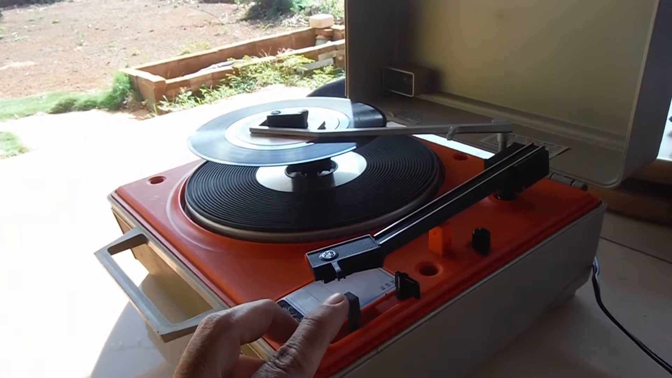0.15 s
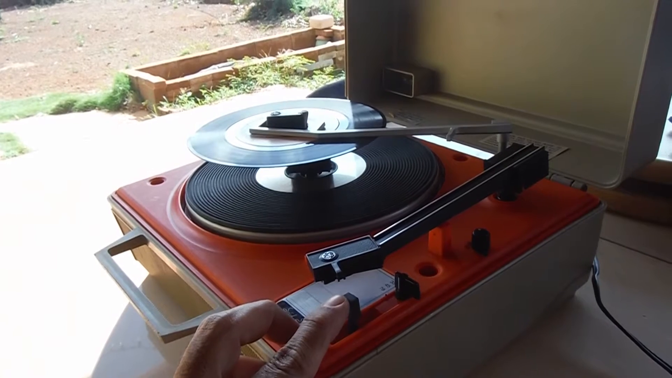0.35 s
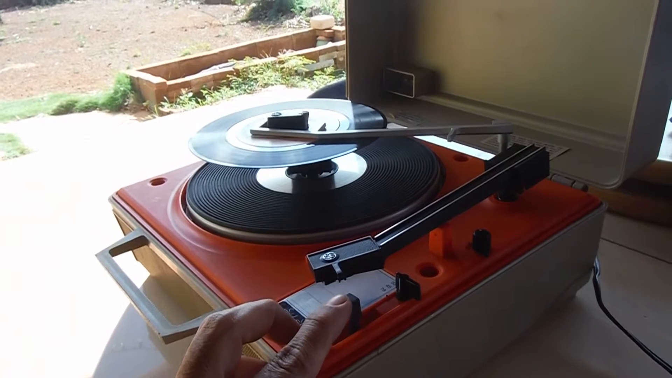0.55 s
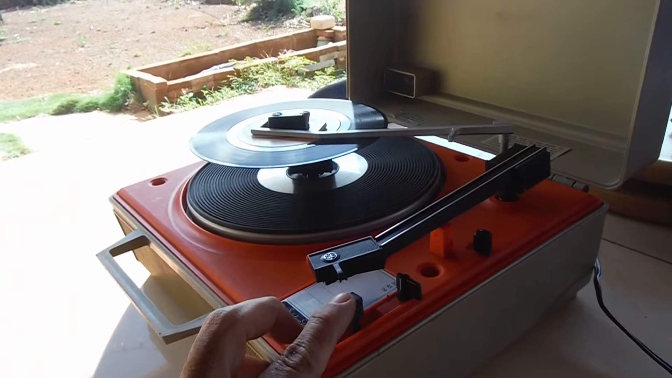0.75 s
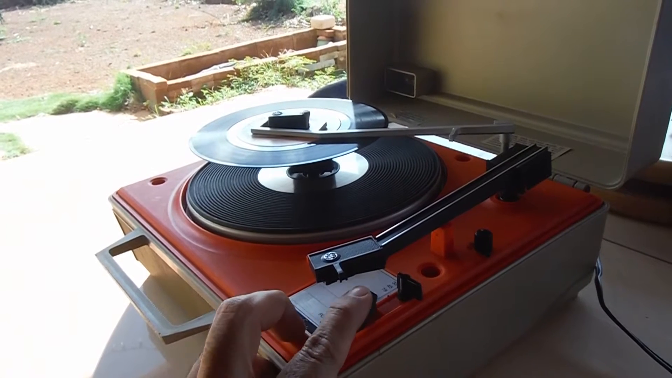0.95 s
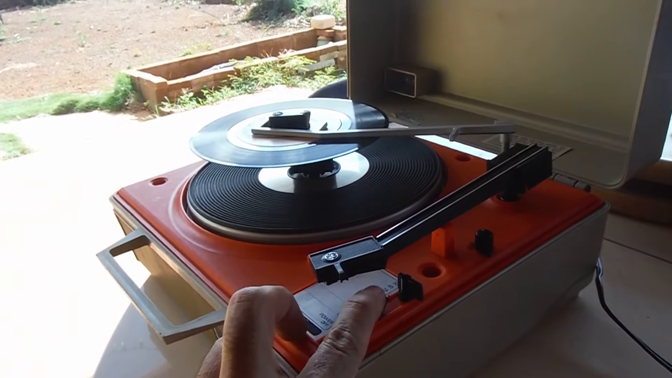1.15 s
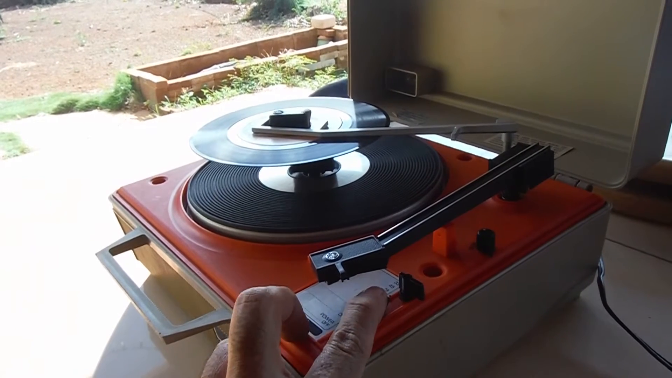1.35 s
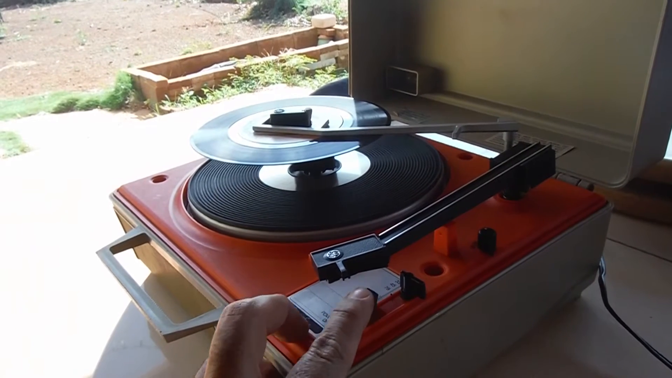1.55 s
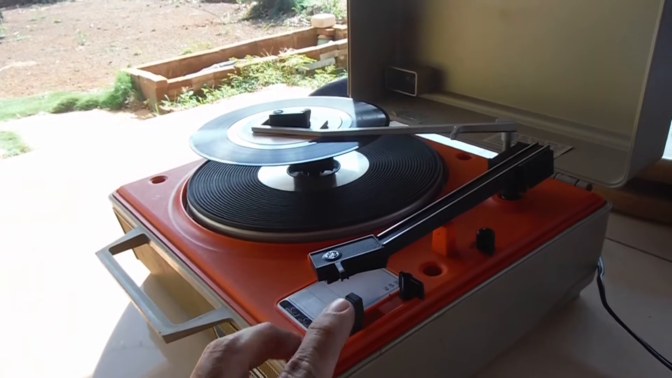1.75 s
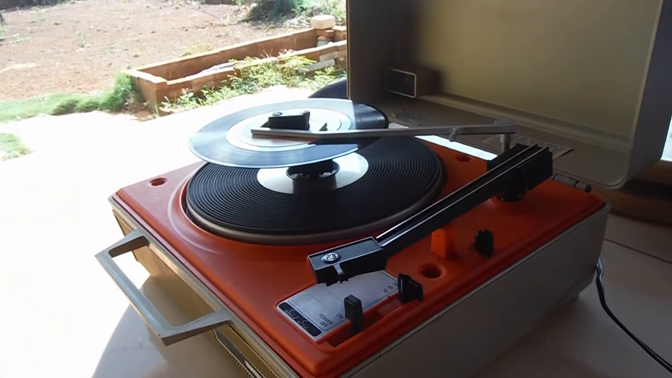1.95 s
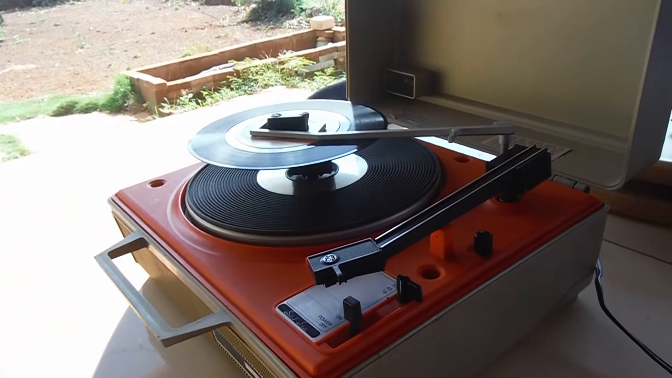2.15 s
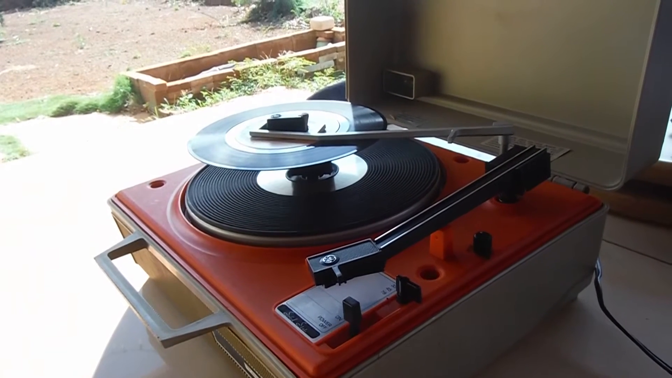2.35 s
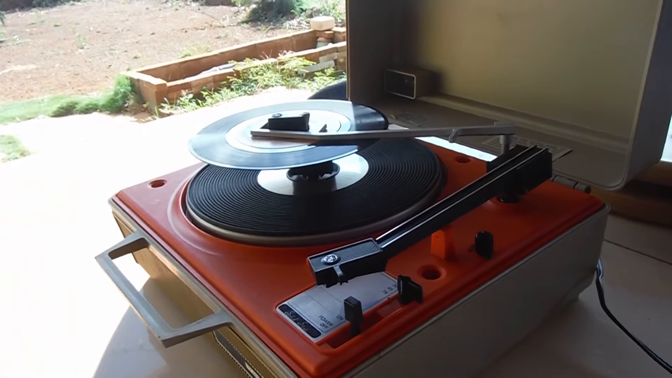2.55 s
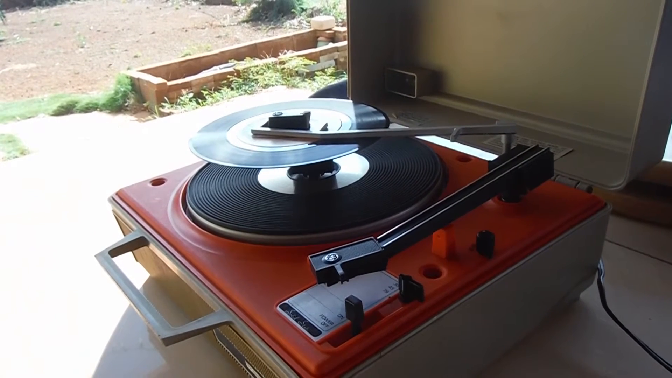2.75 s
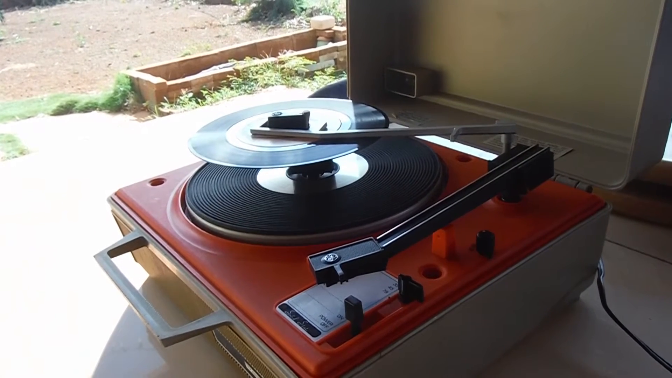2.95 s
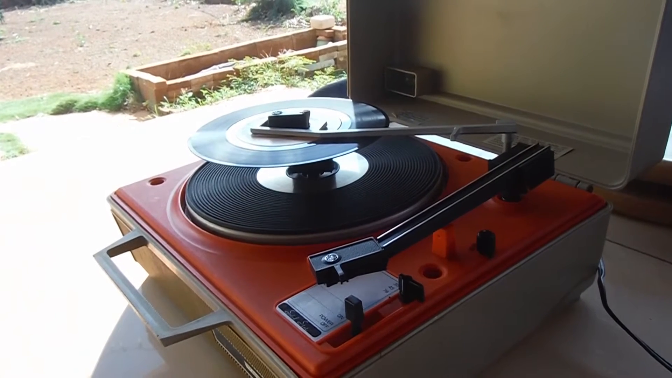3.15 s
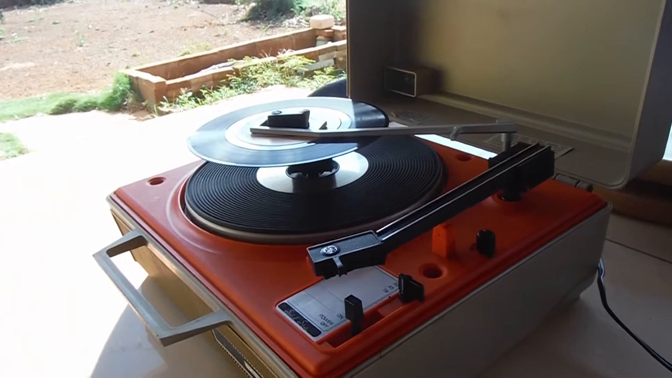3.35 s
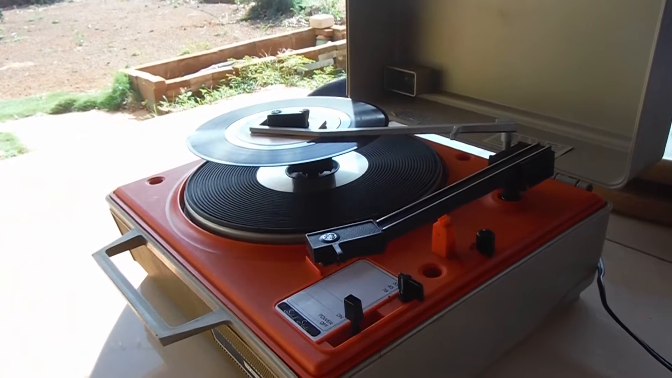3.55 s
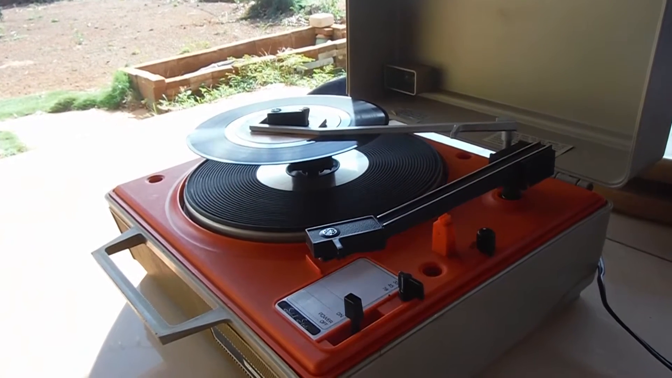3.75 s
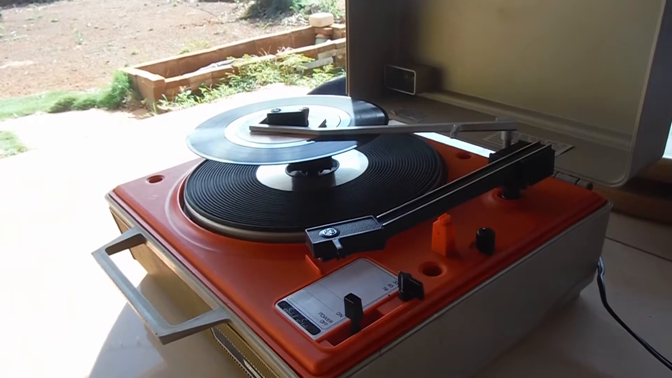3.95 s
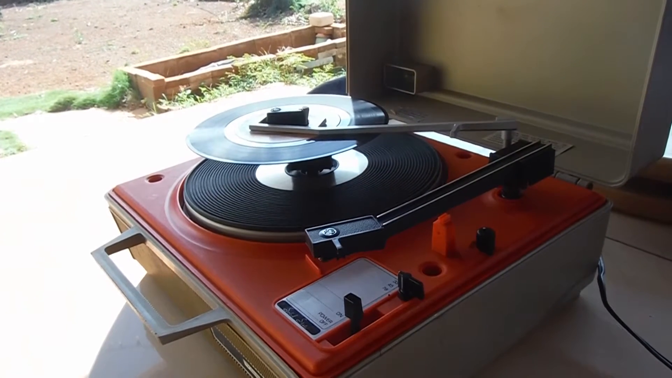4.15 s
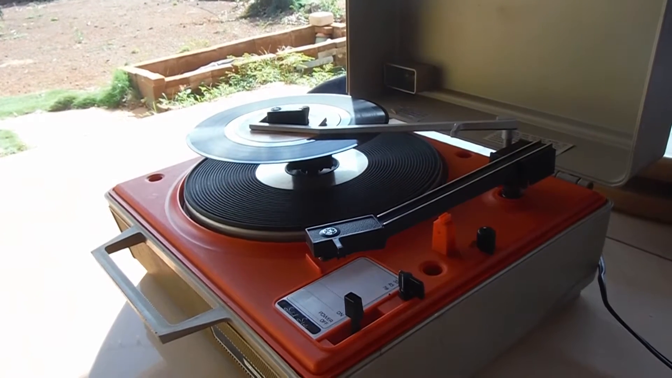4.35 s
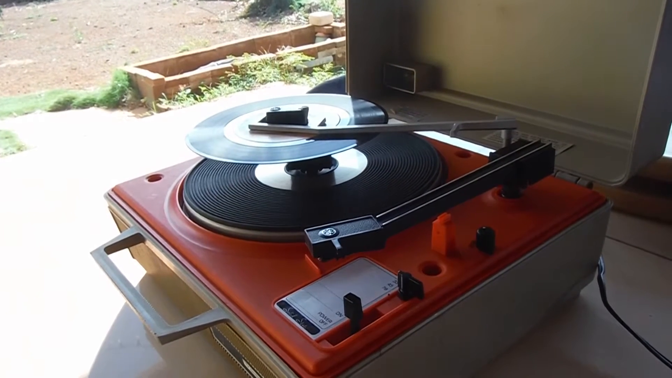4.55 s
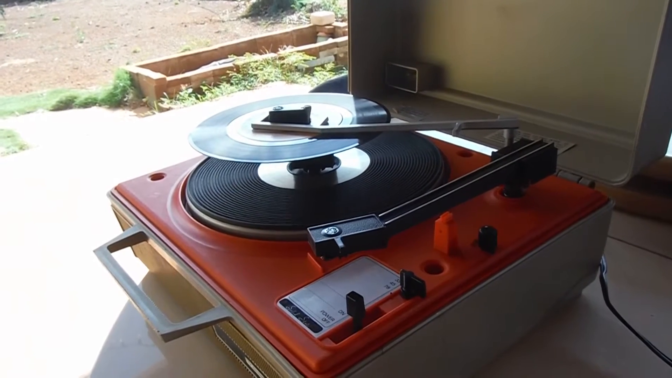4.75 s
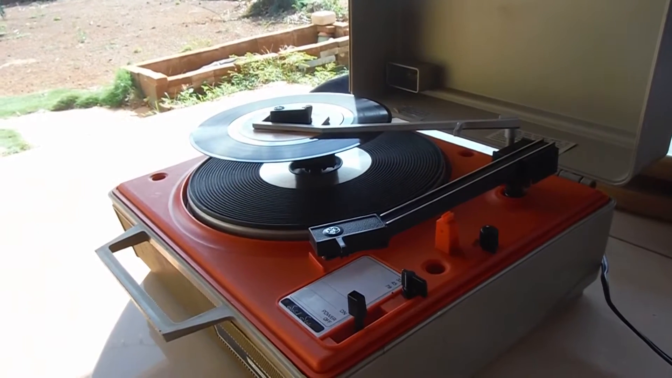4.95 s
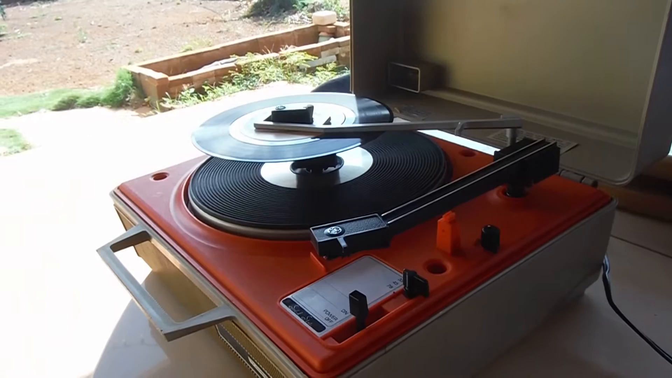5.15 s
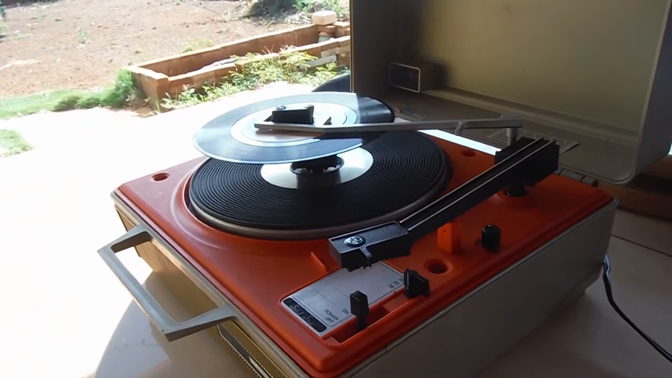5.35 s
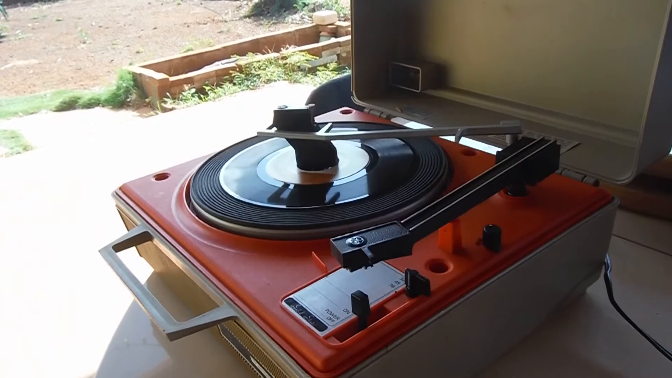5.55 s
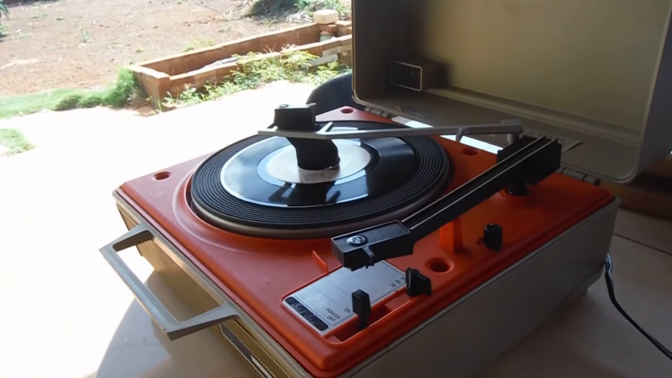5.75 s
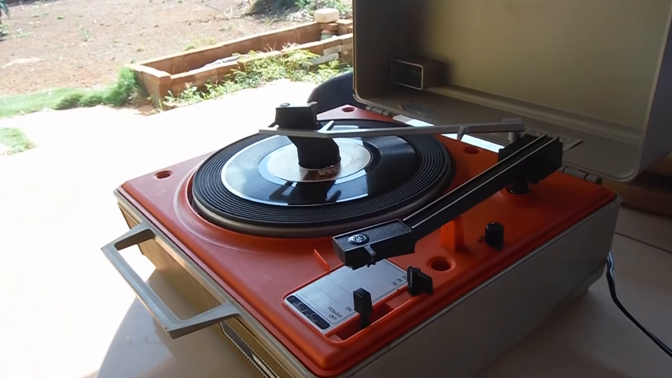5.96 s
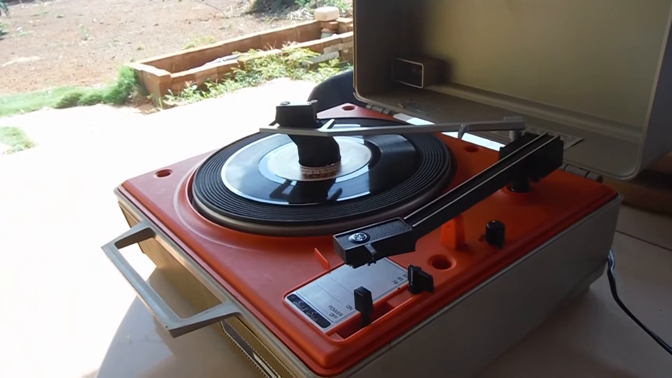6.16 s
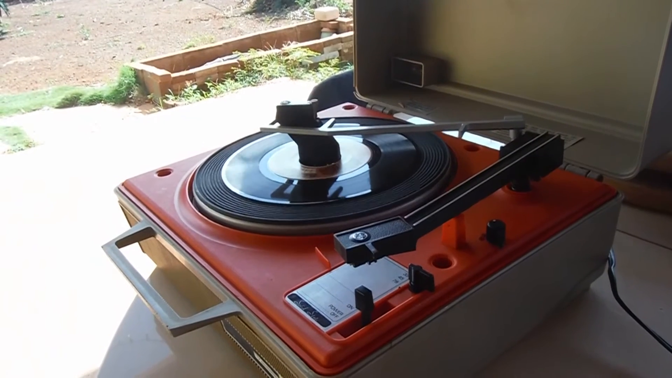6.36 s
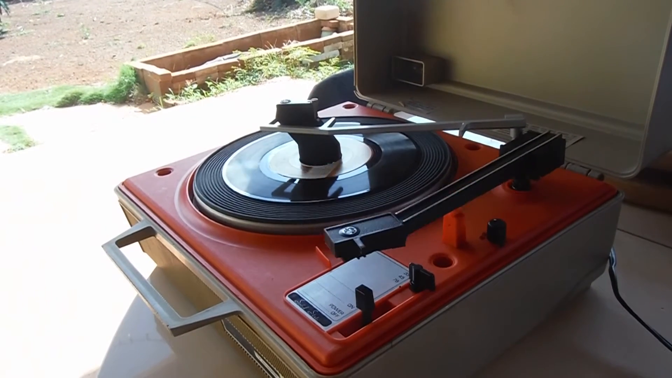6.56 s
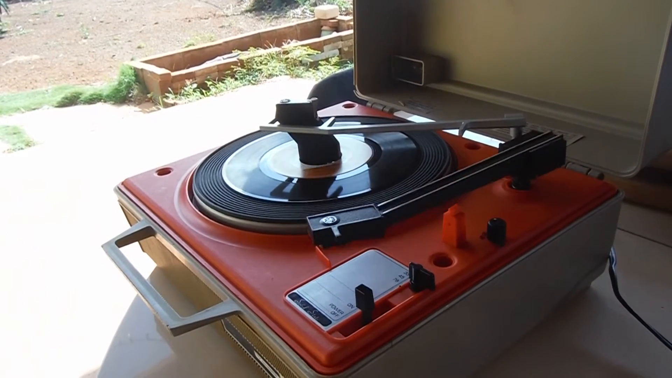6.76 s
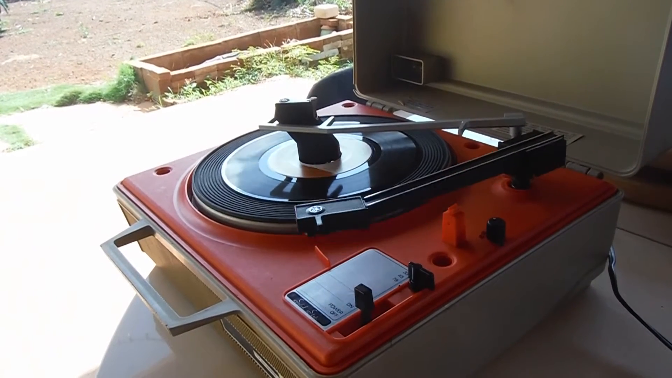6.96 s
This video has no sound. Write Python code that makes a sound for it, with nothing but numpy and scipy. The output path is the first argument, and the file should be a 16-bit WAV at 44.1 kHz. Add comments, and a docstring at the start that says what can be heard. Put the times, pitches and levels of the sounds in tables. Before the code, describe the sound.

Clicks and clacks of an automatic record player dropping a disc onto its platter, over a faint motor hum and low wind rumble.

```python
"""A porch, the microphone close to a portable record changer. Its drive hums and whirrs from the start,
while an insect's thin buzz fades out against a far chorus in the garden. Just after 1 s a finger slides
the lever through its detents, and puffs of air begin to thud on the microphone. From 2.2 s cam and tone
arm knock under the deck; near 4 s the steel linkage snaps over. At 5.5 s the spindle lets go and a
single slaps onto the platter, the loudest sound; two light knocks follow as the drive runs on."""
import sys
import numpy as np
from scipy import signal
from scipy.fft import rfft, irfft, next_fast_len
from scipy.io import wavfile
from scipy.ndimage import map_coordinates

SR = 44100
rng = np.random.default_rng(int(sys.argv[2]) if len(sys.argv) > 2 else 0)


def file_out(sig):
    """Save sig as 16-bit WAV at sys.argv[1]."""
    # one column per channel
    cols = np.atleast_2d(sig).T
    # limit, then scale
    lim = np.clip(cols, -1, 1)
    pcm = np.round(lim * 32767).astype(np.int16)
    wavfile.write(sys.argv[1], SR, pcm)


N = 308876


def amp(db):
    """Decibels to gain."""
    return 10 ** (np.asarray(db) / 20)


def unit(x):
    """x at rms 1."""
    return x / np.sqrt(np.mean(x ** 2) + 1e-20)


def along(points, hz):
    """Interpolate (f/Hz, value) points on a log frequency axis."""
    f, v = np.transpose(points)
    return np.interp(np.log(hz + 1), np.log(f + 1), v)


def wobble(rate):
    """A smooth random curve, rate knots a second."""
    coarse = np.linspace(0, N, 3000)
    knots = map_coordinates(rng.standard_normal(1024), [coarse * rate / SR], mode="wrap")
    return np.interp(np.arange(N), coarse, knots)


def noise(spectrum):
    """Noise of rms 1, shaped by (f/Hz, level/dB) points."""
    m = next_fast_len(N + 8192)
    gain = amp(along(spectrum, np.fft.rfftfreq(m, 1 / SR)))
    return unit(irfft(rfft(rng.standard_normal(m)) * gain, m)[:N])


def add(track, s, sound):
    """Mix a sound into the track at s seconds."""
    start = round(s * SR)
    track[start:start + len(sound)] += sound[:N - start]


def gate(start, end, rise_s, fall_s):
    """An envelope from 0 to 1: attack at the start, hold, and release from the end."""
    t = np.arange(N) / SR
    return np.clip((t - start) / rise_s, 0, 1) * np.exp(-np.maximum(t - end, 0) / fall_s)


def swells(rows, rise_s, fall_s):
    """The gain of (start/s, end/s, level/dB) swells, their powers added."""
    return np.sqrt(sum((amp(db) * gate(start, end, rise_s, fall_s)) ** 2 for start, end, db in rows))


def shifts_db(rows, rise_s, fall_s):
    """A level that rests at 0 dB and shifts for each (start/s, end/s, shift/dB)."""
    return sum(db * gate(start, end, rise_s, fall_s) for start, end, db in rows)


def drive(lull_db):
    """The motor drones, hums and whirrs; a low, unsteady tone swells as the cam loads it."""
    hum_partials = [(289, -68.5), (720, -76.5), (1095, -68.5), (1216, -75.5)]  # motor hum: f/Hz, level/dB
    whirr_spectrum = [(130, -24), (220, -2), (336, -5.5), (404, -9.5), (610, -11), (714, -9.5), (787, -12),
                      (1020, -11.5), (1090, -12), (1410, -16.5), (4000, -30.5), (5200, -48.5), (8800, -120)]  # running drive: f/Hz, level/dB
    arm_swing = [(3.53, 3.92, 2)]  # more whirr while the tone arm moves: start/s, end/s, lift/dB
    drone_swells = [(1.95, 3.05, -57.5), (5.7, 6.6, -52.5)]  # the low drone grows: start/s, end/s, level/dB
    cam_strokes = [(2.3, 2.68, -62), (2.85, 3.3, -58.5), (3.5, 3.93, -57), (4.18, 4.65, -60),
                   (5.0, 5.9, -63.5), (6.3, 6.95, -65)]  # the cam takes up the load: start/s, end/s, level/dB
    load_rise_s, load_fall_s = 0.07, 0.09

    def tone(hz, drift):
        """A sine of rms 1 with wandering pitch."""
        pitch_hz = hz * (1 + drift * wobble(21))
        return np.sqrt(2) * np.sin(2 * np.pi * np.cumsum(pitch_hz) / SR)

    effort_db = lull_db + shifts_db(arm_swing, load_rise_s, load_fall_s)
    hum = sum(amp(db + effort_db / 2 + 1.3 * wobble(3.1)) * tone(hz, drift=0.002)
              for hz, db in hum_partials)
    drone_gain = np.hypot(amp(-61.5 + 2.8 * lull_db), swells(drone_swells, load_rise_s, load_fall_s))
    drone = drone_gain * amp(2.5 * wobble(16)) * tone(hz=104, drift=0.13)
    cam_gain = swells(cam_strokes, rise_s=0.12, fall_s=0.196)
    cam = cam_gain * amp(-1 + 3.6 * wobble(45)) * tone(hz=335, drift=0.01193)
    whirr = amp(-59 + effort_db) * noise(whirr_spectrum)
    return hum + drone + cam + whirr


def garden(lull_db):
    """Beyond the porch: hiss, far insects, a nearer one's brief buzz, and a faint rustle each second."""
    chorus_spectrum = [(9300, -41), (10000, -5.5), (10500, -4), (11000, -10), (11550, -2), (12200, -7),
                       (13200, -43)]  # far insects: f/Hz, level/dB
    buzz_spectrum = [(9400, -25), (10100, -11), (10900, -24.5), (11300, -15.5), (11530, -2), (11800, -18),
                     (12250, -7), (12900, -26), (14500, -24)]  # the nearer insect: f/Hz, level/dB
    buzz_fade = [(0, -75), (.15, -71.5), (.45, -67), (.72, -70.5), (.85, -85), (1.1, -120)]  # its buzz swells and fades: t/s, level/dB
    rustle_spectrum = [(3000, -20), (6500, 1), (8500, -1), (11000, -21), (15000, -40)]  # high rustle: f/Hz, level/dB
    hiss_spectrum = [(1000, -3.5), (3000, -2), (9500, -2), (12500, -4), (15800, -5)]  # background hiss: f/Hz, level/dB
    t = np.arange(N) / SR
    hiss_db = -63.5 + lull_db
    chorus = amp(hiss_db - 12 + 4.5 * wobble(110)) * noise(chorus_spectrum)
    insect_db = np.interp(t, *np.transpose(buzz_fade))
    insect = amp(insect_db + 2.5 * wobble(28)) * noise(buzz_spectrum)
    from_rustle_s = (t - 0.38) % 1 - 0.5
    rustle = amp(-65.5) * np.exp(-(from_rustle_s / 0.018) ** 2) * noise(rustle_spectrum)
    return amp(hiss_db) * noise(hiss_spectrum) + chorus + insect + rustle


def draught(lull_db):
    """Gusts bring a lumpy rumble and shed eddies: each is one push and pull on the microphone."""
    gusts = [(1.24, 1.37, -49), (1.91, 1.96, -51), (2.36, 2.78, -50), (3.0, 3.09, -48.5),
             (3.9, 4.28, -56.5), (5.24, 5.45, -50), (5.65, 6.96, -51), (6.41, 6.53, -43.5)]  # air reaching the microphone: start/s, end/s, level/dB
    rumble_spectrum = [(10, -24.5), (20, 0), (45, 1), (100, -5), (150, -4.5), (220, -12.5), (320, -16.5),
                       (450, -27.5), (900, -71)]  # wind rumble: f/Hz, level/dB
    puffs = [(1.256, -30.5, 121), (2.132, -33, 117), (2.388, -32, 143), (2.474, -31.5, 49.7),
             (2.557, -31, 94), (2.801, -34, 57.6), (2.844, -32, 148), (5.26, -28.5, 124),
             (5.784, -26.5, 100), (5.908, -28.5, 136), (6.171, -36.5, 170), (6.414, -27.5, 104),
             (6.432, -20.5, 108), (6.522, -32, 70.4)]  # strong puffs that thud on their own: t/s, level/dB, f/Hz
    calm_db, eddies_per_s, eddy_hz, half_span_s = -55.5, 16, 85, 0.1
    gust_gain = swells(gusts, rise_s=0.013, fall_s=0.082)
    rumble_gain = np.hypot(amp(calm_db + lull_db), gust_gain) * amp(-1 + 2.4 * wobble(22))
    air = rumble_gain * noise(rumble_spectrum)
    eddies = []
    for i, (jitter, size, speed) in enumerate(rng.standard_normal((300, 3))):
        s = (i + jitter / 2) / eddies_per_s
        if half_span_s < s < N / SR:
            gust_db = 20 * np.log10(gust_gain[int(s * SR)] + 1e-6)
            eddies.append((s, gust_db + 9 + 2.5 * size, eddy_hz * 2 ** (0.6 * speed)))
    t = np.arange(-half_span_s * SR, half_span_s * SR) / SR
    for s, db, hz in puffs + eddies:
        u = 2 * np.pi * hz * t  # eddies that pass quickly sound higher
        add(air, s - half_span_s, -amp(db) * u * np.exp(1.15 - np.sqrt(u * u + 0.24)))
    return air


def chatter(contact_s):
    """Tiny impacts of either sign follow each other until a part settles, driving most pitches evenly."""
    settle = np.exp(-(np.arange(2048) / SR / contact_s) ** 4)
    spectrum = rfft(np.sign(rng.standard_normal(len(settle))) * settle)
    force = irfft(spectrum / np.sqrt(np.abs(spectrum) + 1e-9)) * np.sqrt(settle)
    return force * np.linalg.norm(settle) / np.linalg.norm(force)


def minimum_phase(gain_db):
    """The quickest impulse response with this spectral shape, of energy 1."""
    cepstrum = irfft(np.log(amp(gain_db) + 1e-6))
    half = len(cepstrum) // 2
    cepstrum[1:half] *= 2
    cepstrum[half + 1:] = 0
    response = irfft(np.exp(rfft(cepstrum)))
    return response / np.linalg.norm(response)


def tail(decays):
    """A diffuse echo of energy 1, each frequency dying at its own speed."""
    hz, t, spectra = signal.stft(rng.standard_normal(SR // 2), SR, nperseg=128)
    decay = amp(-60 * t / along(decays, hz)[:, None])
    echo = signal.istft(spectra * decay, SR, nperseg=128)[1]
    echo *= 1 - np.exp(-np.arange(len(echo)) / SR / 0.0072)
    return echo / np.linalg.norm(echo)


def contacts(strikes, colour, modes, peak_db, ring_db, lid_db, porch_db):
    """A part chatters for a few ms against its stop, rings on, and the lid and porch answer."""
    lid_decays = [(200, 0.12), (2000, 0.032), (12000, 0.043)]  # echo of the case and its open lid: f/Hz, t60/s
    porch_decays = [(200, 0.7), (1000, 0.27), (4000, 0.24), (9000, 0.27), (15000, 0.15)]  # echo of the porch: f/Hz, t60/s
    track, t, hz = np.zeros(N), np.arange(SR // 3) / SR, np.fft.rfftfreq(2048, 1 / SR)
    treble = lambda f: 1 - 1 / (1 + (f / 4800) ** 4)  # harder contacts lift everything above this knee
    peaks = [1 / (1 + ((hz - f) / (30 + 0.011 * f)) ** 2) for f, _, _ in modes]
    body_db = along(colour, hz) + peak_db * np.max(peaks, axis=0)  # radiates most near its modes
    for s, db, contact_s, treble_db in strikes:
        hit = np.zeros(len(t))
        for f, mode_db, t60 in modes:
            tilt_db = min(0, treble_db * (2 * treble(f) - 1)) / 2
            start_db = ring_db + mode_db + rng.normal(0, 1.7) + tilt_db
            phase = 2 * np.pi * (f * t + rng.random())
            rattle = np.cumsum(rng.normal(0, 0.06, len(t)))  # loose mountings blur the phase
            hit += amp(start_db - 60 * t / t60) * np.sin(phase + rattle)
        hit *= 1 - np.exp(-2 * t / contact_s)  # the ring builds during the contact
        body = minimum_phase(body_db + treble_db * treble(hz))
        add(hit, 0, signal.fftconvolve(chatter(contact_s), body))
        echo = amp(lid_db) * tail(lid_decays) + amp(porch_db) * tail(porch_decays)
        add(track, s, amp(db) * (hit + signal.fftconvolve(hit, echo)[:len(t)]))
    return track


def lever():
    """The control lever clicks through its detents."""
    clicks = [(1.169, -53.5, 0.0045, 8), (1.208, -42.5, 0.004, 15.5), (1.452, -45.5, 0.0042, 0.5),
              (1.489, -52.5, 0.0035, 12), (1.650, -35.5, 0.0047, -2.5)]  # detents: t/s, level/dB, contact/s, treble/dB
    colour = [(150, -17), (350, -12), (700, -9.5), (1110, -1), (1500, -10), (1900, -3), (2500, 0),
              (3600, -12.5), (6200, -15.5), (9300, -12), (15800, -49)]  # broad spectrum: f/Hz, level/dB
    modes = [(375, -8.5, 0.18), (690, -6, 0.086), (1156, 1, 0.07), (1777, 10, 0.04)]  # resonances: f/Hz, level/dB, t60/s
    return contacts(clicks, colour, modes, peak_db=7, ring_db=-11, lid_db=-1, porch_db=-9.5)


def sliding():
    """Dry friction as parts slide before they catch: uneven grains swell and fade over each stroke."""
    slides = [(1.477, 1.574, -60), (1.577, 1.71, -58.5), (3.856, 3.95, -62), (3.564, 3.568, -39),
              (3.947, 4, -41), (5.45, 5.474, -37)]  # strokes: start/s, end/s, level/dB
    rub_spectrum = [(200, -29), (700, 2.5), (1100, -3), (2000, 1), (3200, -9), (8000, -14), (15800, -43)]  # friction: f/Hz, level/dB
    track = np.zeros(N)
    grains = noise(rub_spectrum) * unit(amp(1.1 * wobble(110)))
    for start, end, db in slides:
        stroke = np.sin(np.linspace(0, np.pi, max(2, round((end - start) * SR))))
        add(track, start, amp(db) * stroke * grains[round(start * SR):][:len(stroke)])
    return track


def deck():
    """The cam and the tone arm knock under the plastic deck."""
    knocks = [(2.243, -34.5, 0.0053, -0.5), (2.294, -38, 0.011, 3), (2.309, -33.5, 0.0074, 8),
              (3.257, -51.5, 0.0031, 9), (3.558, -55, 0.012, 15), (3.568, -28.5, 0.0062, -14),
              (4.668, -60, 0.0048, 16), (5.272, -47, 0.0033, 11), (6.328, -40.5, 0.0063, -19),
              (6.524, -54, 0.0024, 3)]  # cam and arm: t/s, level/dB, contact/s, treble/dB
    colour = [(150, -35.5), (250, -10), (575, -11), (934, -3), (1470, -10.5), (1740, -2), (2650, -4.5),
              (4230, -13.5), (4770, -25), (7110, -6.5), (8170, -13), (8910, -7.5), (10400, -18),
              (12200, -13.5), (15800, -28)]  # broad spectrum: f/Hz, level/dB
    modes = [(361, -8, 0.17), (659, -1.5, 0.063), (989, 3, 0.0408), (1757, -23, 0.064), (2540, -6.5, 0.071),
             (3070, -12, 0.043), (3420, -2.5, 0.043)]  # resonances: f/Hz, level/dB, t60/s
    return contacts(knocks, colour, modes, peak_db=7.5, ring_db=-8, lid_db=-7.5, porch_db=-16)


def linkage():
    """The steel linkage snaps over and rings."""
    snap = [(3.9585, -15, 0.008, 0.0015)]  # one strike: t/s, level/dB, contact/s, treble/dB
    colour = [(120, -10.5), (200, -9.5), (610, -11), (981, -2), (1140, -2.5), (1310, -12), (2190, -3),
              (2540, -10), (3280, -5), (3590, -6), (5780, -12.5), (8800, -5), (9640, -8), (14200, -7.5),
              (15800, -19)]  # broad spectrum: f/Hz, level/dB
    modes = [(624, -4, 0.17), (730, -22, 0.092), (1130, -1, 0.13), (1403, 5.5, 0.18), (1863, -1, .045),
             (2110, -9, 0.066), (2190, -4, 0.049), (4680, 2, 0.057), (7000, -1, .13), (7180, -5, 0.14),
             (8860, 4.5, .1), (8530, -2, 0.18), (11380, -8, .13)]  # resonances: f/Hz, level/dB, t60/s
    return contacts(snap, colour, modes, peak_db=8.5, ring_db=-24.5, lid_db=-8, porch_db=-19)


def spindle():
    """The spindle's catch trips and scrapes past the single's centre hole."""
    clicks = [(5.4455, -38.5, 0.0041, -4.5), (5.458, -25, 0.0018, 5.5), (5.470, -26, 0.0072, 3.5),
              (5.474, -17.5, 0.0043, 7.5), (5.478, -21.5, 0.01, -8), (5.487, -33, 0.0036, 3)]  # the catch: t/s, level/dB, contact/s, treble/dB
    colour = [(88, -32.5), (160, -11), (230, -2), (380, -4.5), (520, -22.5), (900, -1.5), (1450, -12.5),
              (2150, -9.5), (3000, -13), (4540, -23.5), (7000, -13), (9100, -7.5), (10000, -16),
              (14600, -16), (15800, -34)]  # broad spectrum: f/Hz, level/dB
    modes = [(222, 6, .06), (377, -1.5, 0.058), (620, -9.5, .09), (950, -1, 0.075), (1110, 4, 0.11),
             (1695, -5.5, 0.063), (8980, -0.5, 0.052)]  # resonances: f/Hz, level/dB, t60/s
    return contacts(clicks, colour, modes, peak_db=8, ring_db=-16.5, lid_db=-12.5, porch_db=-12.5)


def falling_single():
    """The single lands on the platter, slaps flat and bounces."""
    slaps = [(5.520, -7, 0.0031, 3.5), (5.529, -26, .005, -3), (5.547, -20, .0012, 24),
             (5.639, -50.5, 0.0062, 7)]  # disc on platter: t/s, level/dB, contact/s, treble/dB
    colour = [(120, -35.5), (220, -13), (500, -17.5), (900, -20.5), (1300, -8.5), (1550, -13.5),
              (1950, 0.5), (2700, -2), (3500, -9), (4700, -4.5), (5800, -14), (7500, -2), (11000, -10),
              (15800, -20)]  # broad spectrum: f/Hz, level/dB
    modes = [(699, -8.5, .18), (924, -9, 0.42), (1190, -5.5, 0.24), (2060, -7.5, .09), (2600, -6, .05),
             (4396, -1, .07), (5180, -4, 0.14), (5410, -5, .11), (7230, 0.5, .11), (7810, -5, 0.1),
             (8600, -2.5, 0.1), (10460, -6.5, .09)]  # resonances: f/Hz, level/dB, t60/s
    return contacts(slaps, colour, modes, peak_db=6, ring_db=-24.5, lid_db=-4, porch_db=-16.5)


def scene():
    """One microphone on the porch: the changer near, the garden behind it."""
    lulls = [(-1, 1.17, -4), (4.5, 5.22, -3)]  # the background is quieter twice: start/s, end/s, shift/dB
    lull_db = shifts_db(lulls, rise_s=0.1, fall_s=0.08)
    changer = lever() + deck() + linkage() + spindle() + falling_single() + sliding()
    return (changer + draught(lull_db) + drive(lull_db) + garden(lull_db))[None]


def record(dry):
    """The recorder rounds off the highest peaks and keeps nothing above its band limit."""
    ceiling, top_hz = 0.9, 15900
    rounded = dry / (1 + np.abs(dry / ceiling) ** 6) ** (1 / 6)
    m = next_fast_len(N + SR // 2)
    passband = 1 / (1 + (np.fft.rfftfreq(m, 1 / SR) / top_hz) ** 160)
    return irfft(rfft(rounded, m) * passband, m)[..., :N]


dry = scene()
out = record(dry)
file_out(out)
```